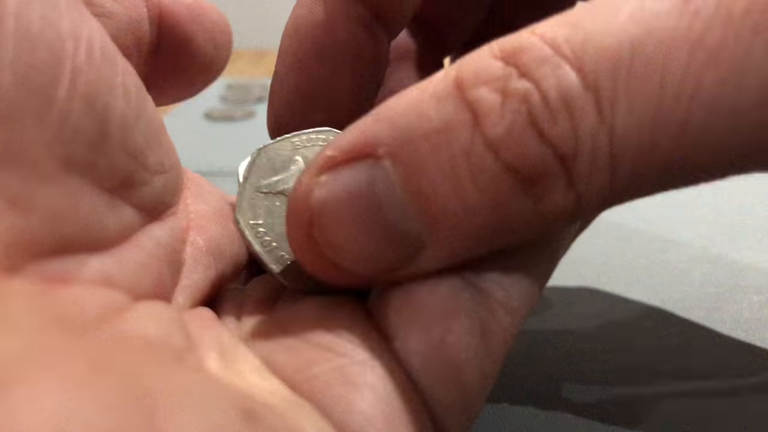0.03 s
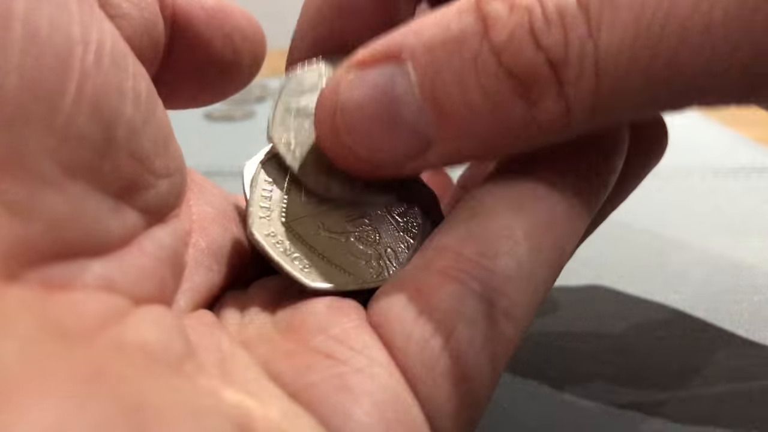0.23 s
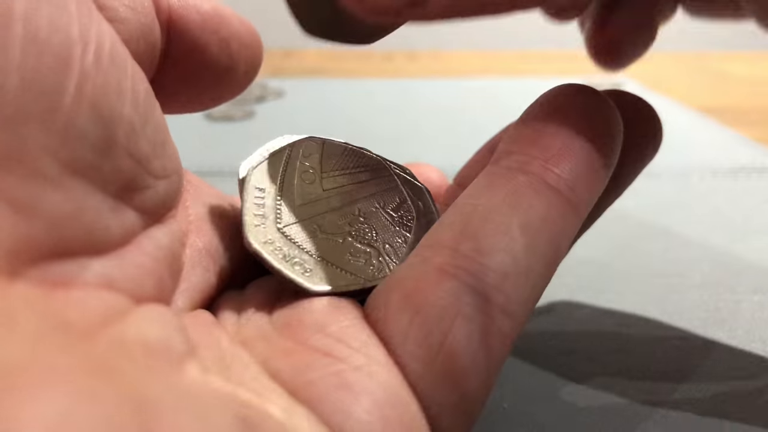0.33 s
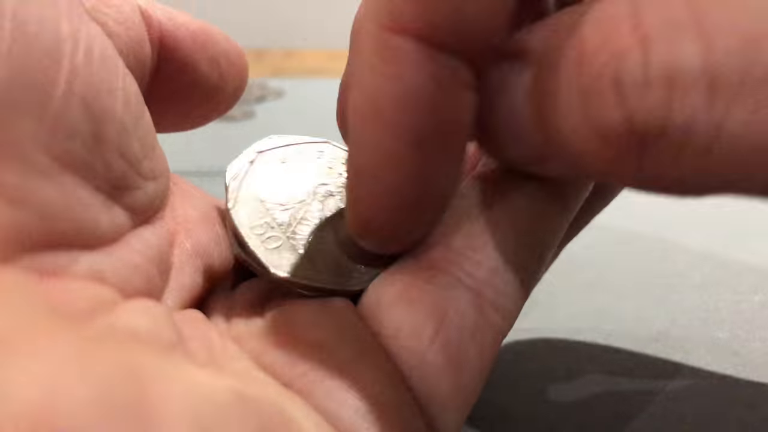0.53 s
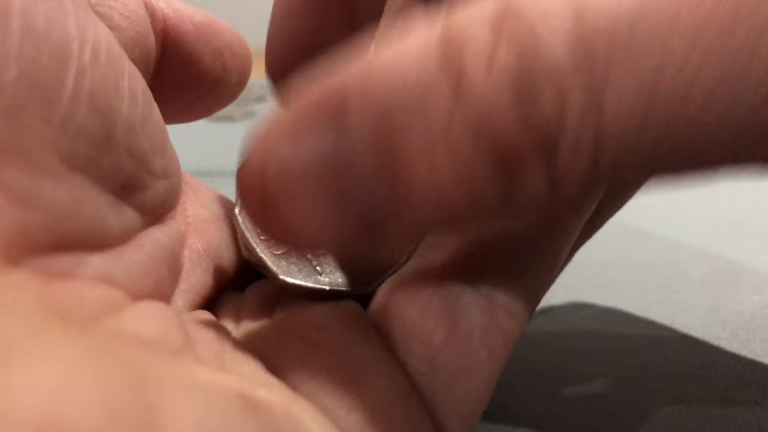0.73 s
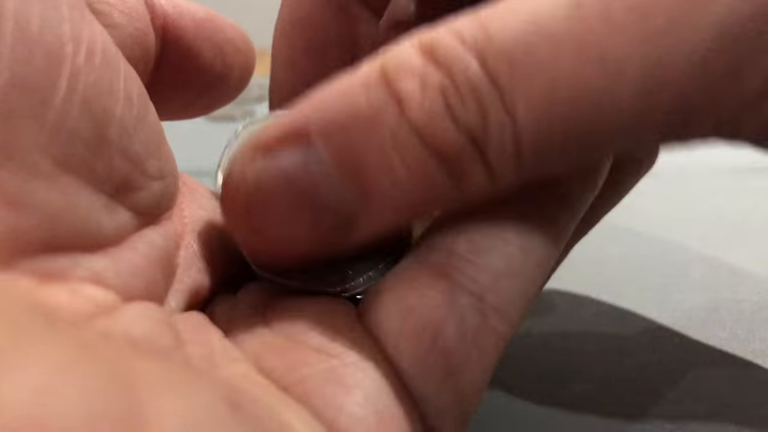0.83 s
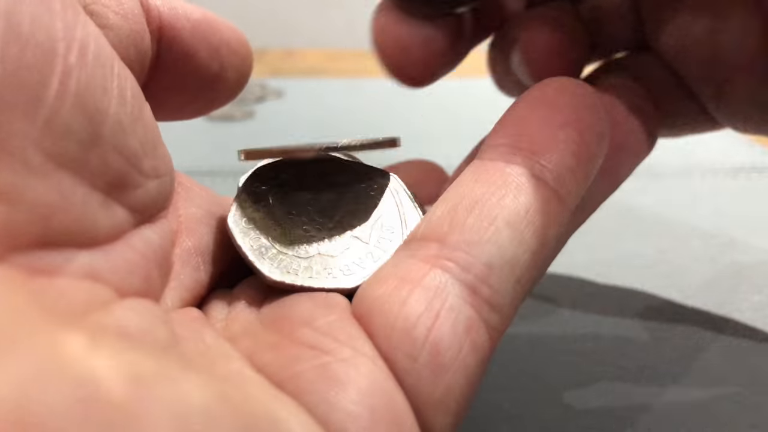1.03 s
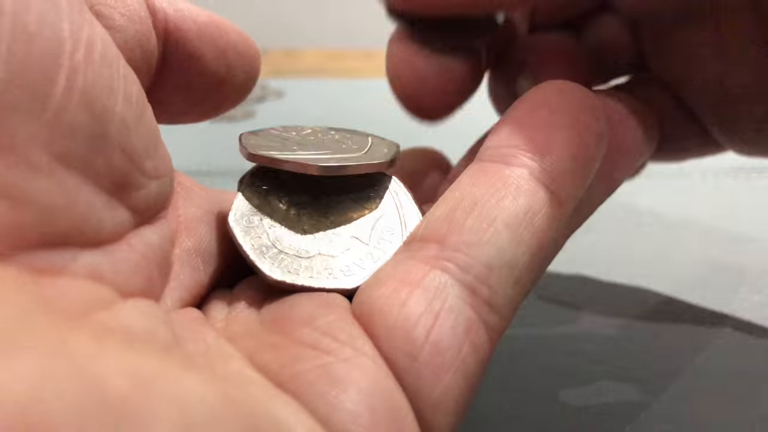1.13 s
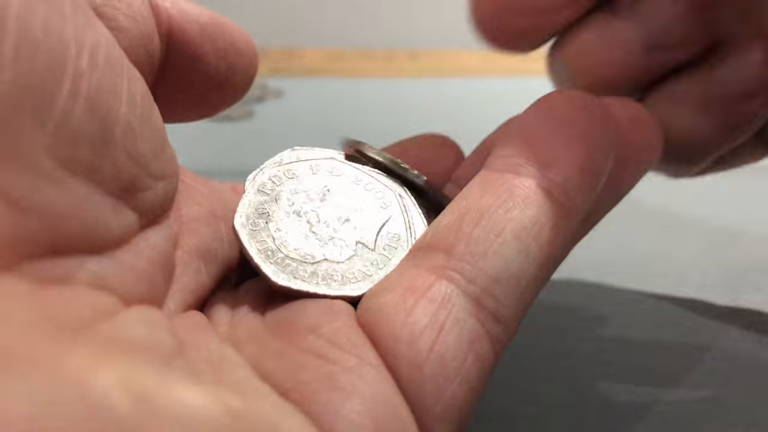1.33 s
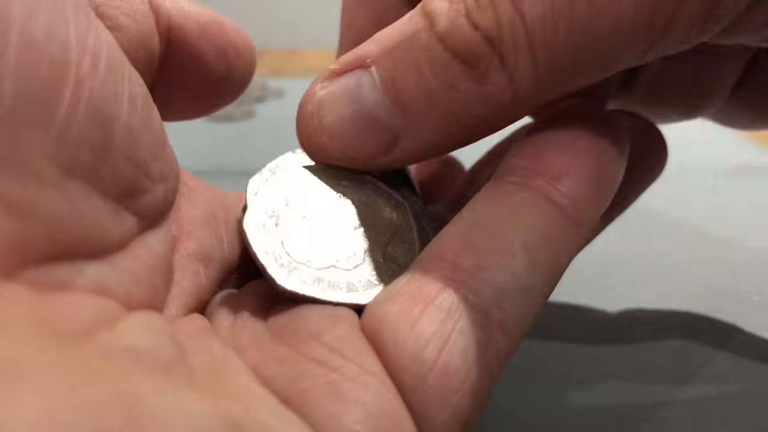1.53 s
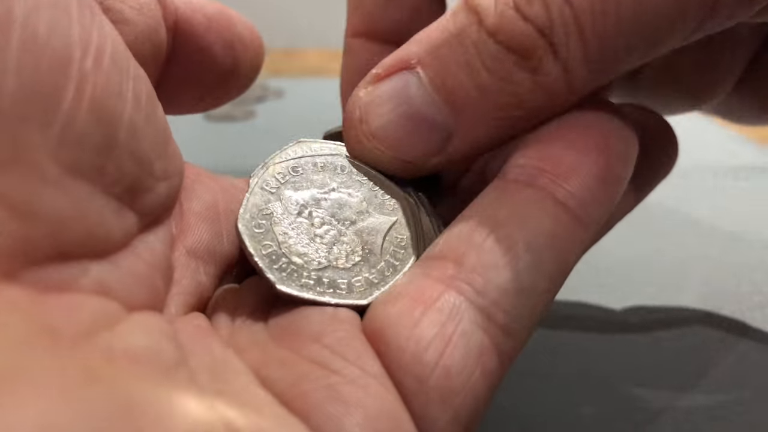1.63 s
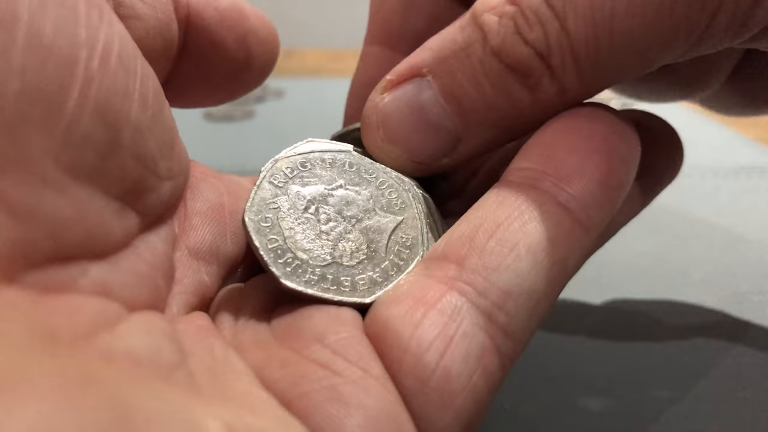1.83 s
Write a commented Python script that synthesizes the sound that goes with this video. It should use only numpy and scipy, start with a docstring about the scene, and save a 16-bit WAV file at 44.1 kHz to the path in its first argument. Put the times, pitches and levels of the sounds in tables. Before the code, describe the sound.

Coins clink and scrape against each other as fingers slide them in a palm.

```python
"""Small ticks and scrapes of coins, slid and flipped in a cupped palm, close by in a quiet room.
The rims tap each other and rub over the raised faces; skin stops nearly every ring at once.
Loose coins strike with a brighter crack, and one tips free and rings on two close tones as it turns.
Underneath lie soft bumps and rustles of the hand, still air and a faint mains hum."""
import sys
import numpy as np
from scipy import signal
from scipy.fft import rfft, irfft
from scipy.io import wavfile

SR = 44100
rng = np.random.default_rng(int(sys.argv[2]) if len(sys.argv) > 2 else 0)


def output_pcm(signal):
    """Save a mono or channel-first signal as 16-bit PCM at the path in sys.argv[1].

    Samples are clipped to [-1, 1] before scaling.
    """
    pcm = np.clip(np.atleast_2d(signal).T, -1, 1) * 32767
    wavfile.write(sys.argv[1], SR, np.round(pcm).astype(np.int16))


N = 83790

FIRM_DB, FIRM_SLIPS_PER_S = -20.5, 2400  # a scrape at this level slips this often
GRIP_STEP_S, SPOT_S = 0.0021, 0.007  # how soon the finger pressure and the touching spot change
# A rim slides over a coin's face:
# (start [s], end [s], start level [dB], end level [dB], low boost [dB], treble boost [dB])
RIM_SLIDES = [(0.122, 0.132, -50, -47.5, 22, -5), (0.203, 0.253, -35, -46.5, 9.5, -1),
              (0.258, 0.33, -53, -41.5, 12.5, -9), (0.326, 0.345, -32, -33.5, 9.5, -8),
              (0.349, 0.396, -24.5, -27.5, 6.5, 1.5), (0.537, 0.563, -20, -23, 9, 2.5),
              (0.563, 0.596, -25.5, -18.5, 6.5, 8.5), (0.595, 0.631, -19, -34, 1, 3.5),
              (0.85, 0.883, -20.5, -40.5, 7.5, 0.5), (0.868, 0.911, -38, -51, 14, 1.5),
              (0.916, 0.936, -34, -25, -2, -15), (0.936, 0.966, -15.5, -26, -0.5, -7.5),
              (0.969, 0.982, -39.5, -36, 12, -1), (0.986, 1.027, -28.5, -32, 7, -5),
              (1.02, 1.042, -16, -22, 3.5, 11), (1.045, 1.122, -28.5, -34, 4.5, 11),
              (1.13, 1.184, -22.5, -47.5, -5.5, -0.5), (1.196, 1.225, -50, -44, 10.5, -7),
              (1.268, 1.327, -27.5, -50, 1.5, -0.5), (1.315, 1.43, -44, -37, 8, -6),
              (1.448, 1.487, -29, -33.5, 0.5, 6), (1.485, 1.589, -42.5, -48.5, 9, -2),
              (1.589, 1.605, -34, -27, 10.5, 1), (1.611, 1.712, -46.5, -48.5, 19, -3)]
def scrape(start, end, from_db, to_db, low_db, treble_db, spots=4):
    """A rim catches and slips on the raised pattern; a gentle slide has fewer slips and sounds grainy."""
    n = int((end - start) * SR)
    t = np.arange(n) / SR
    level_db = np.linspace(from_db, to_db, n)
    slips_per_s = FIRM_SLIPS_PER_S * amp(0.6 * (level_db - FIRM_DB))
    slipping = rng.random(n) < slips_per_s / SR
    strength = amp(4 * np.minimum(rng.exponential(1, n), 2))  # slips differ by up to 8 dB
    slips = slipping * strength * rng.choice([-1, 1], n)
    slips /= np.sqrt(slips_per_s / FIRM_SLIPS_PER_S)  # fewer slips, same energy
    hiss = 0.18 * rng.standard_normal(n)
    pressure_db = wander(t, GRIP_STEP_S)
    force = (slips + hiss) * amp(pressure_db + level_db)
    force = unit_energy(force) * np.linalg.norm(amp(level_db))
    out = amp(-8) * signal.fftconvolve(force, unit_energy(held_ring()))
    spot = (t // SPOT_S) % spots
    for k in range(spots):  # each spot the rim touches has its own tone colour
        add(out, 0, signal.fftconvolve(force * (spot == k), stack_click(low_db, treble_db)))
    return out


# One coin rattles against another: (time [s], level [dB], low boost [dB], treble boost [dB])
RIM_TICKS = [(0.1187, -32.5, -12, -7), (0.2055, -23.5, -16, -14), (0.2190, -14.5, -34, -0.5),
             (0.271, -31, 6, -3), (0.2828, -36.5, 9, -7), (0.2979, -29, 1.5, -7.5), (0.3035, -40, -4, -7),
             (0.3114, -24, 3, -10), (0.3177, -26, -9, -3), (0.3372, -23, 5, -8), (0.3478, -16.5, 8.5, 7),
             (0.3613, -18, 9, 12), (0.368, -21.5, 7, 6), (0.5596, -12, -13, 5.5), (0.5892, -11.5, -0.5, 10),
             (0.5912, -9, -17, 17.5), (0.8518, -19.5, -5.5, -6), (0.8593, -17, -11.5, 4),
             (0.88, -27, -27, -9), (0.8888, -35, -2, -4), (0.9148, -16.5, -9, -5.5),
             (0.9371, -15.5, 0.5, 20), (0.9636, -14.5, -4.5, 5), (0.9891, -20.5, 4, 3),
             (1.0003, -18.5, -23, 11), (1.0196, -14, -21, 0), (1.0341, -14, -22, 3), (1.0404, -18, -10, 10),
             (1.3228, -29.5, 3, -23), (1.3983, -26, -8, 9), (1.4178, -26, -7, 9), (1.4402, -16.5, 2, -2.5),
             (1.4546, -23, 5.5, -8), (1.4622, -22.5, -16, -13), (1.4892, -31, 2, -3),
             (1.5031, -29.5, -6, -17), (1.5944, -17.5, -4.5, 2), (1.598, -18, 1, 5.5),
             (1.6798, -35, 8, -19), (1.8499, -31, 5.5, -2.5), (1.8802, -29.5, 9, 4), (1.8908, -35, 12, 0)]
def tick(level_db, low_db, treble_db, chatter_s=0.0007, size=600):
    """Two rims buzz together for an instant, muffled by the stack of coins."""
    age = np.arange(size) / SR / chatter_s
    chatter = rng.standard_normal(size) * np.sqrt(age) * np.exp(-age)
    out = amp(-16) * held_ring()
    add(out, 0, burst(signal.fftconvolve(chatter, stack_click(low_db, treble_db))))
    return amp(level_db) * out


LOW_PAIR_HZ, HIGH_PAIR_HZ = (8539, 8687), (14638, 14706)  # a loose coin's natural tones
# A loose coin hits or bounces:
# (time [s], crack [dB], low pair [dB], high pair [dB], time to fade by 60 dB [s])
COIN_STRIKES = [(.5329, -10, -15.5, -9.5, 0.032), (.5382, -19, -32, -24, 0.015),
                (.5406, -26, -18, -34, 0.018), (.5439, -19, -34, -21, .025),
                (.5905, -20, -24, -25.5, 0.031), (.6108, -24.5, -15, -11, 0.031),
                (1.0893, -40, -23.5, -22.5, 0.035), (1.1316, -17.5, -14, -12, 0.037),
                (1.1355, -30, -39, -21, 0.064), (1.1635, -34.5, -44.5, -24, .04),
                (1.2693, -25, -13, -19.5, .04), (1.4395, -36, -18, -24, 0.1),
                (1.5227, -33.5, -33, -44.5, 0.07), (1.6342, -28, -18, -34, 0.063)]
def strike(crack_db, low_db, high_db, fade_s, rise_s=0.0003, size=6000):
    """A crack and a softer tick, then two pairs of close tones ring until the skin stops them."""
    t = np.arange(size) / SR
    tones = np.zeros(size)
    for db, pair in [(low_db, LOW_PAIR_HZ), (high_db, HIGH_PAIR_HZ)]:
        for hz, offset_db in zip(pair, [-9, 0]):  # the lower tone is weaker, so the pair wavers mildly
            tones += amp(db + offset_db) * np.sin(2 * np.pi * (hz * t + rng.random() / 4))
    out = tones * amp(-60 * t / fade_s) * (1 - np.exp(-t / rise_s))
    add(out, 0, amp(crack_db) * crack())
    add(out, 0, tick(crack_db - 7, low_db=-8, treble_db=-12.5))
    return out


# Tone colour of a clean hit: (frequency [Hz], relative level [dB])
CRACK_COLOUR = [(200, -38), (480, -19), (1400, -13.5), (4200, 1.5), (6500, 6), (11000, -3), (16000, -7)]
def crack():
    """Metal meets metal in one sharp, bright push."""
    return burst(coloured(np.ones(1), lambda hz: look_up(CRACK_COLOUR, hz)))


# How strongly a turning coin sends out its low pair: (time [s], lower tone [dB], upper tone [dB])
COIN_TURN = [(1.1347, -32, -12), (1.143, -24.5, -28), (1.159, -19.5, -18), (1.188, -31, -26),
             (1.207, -27.5, -38), (1.225, -24, -53), (1.262, -28.5, -36), (1.277, -53.5, -24.5),
             (1.294, -47, -19.5), (1.318, -39, -36)]
def free_coin():
    """Two close tones waver against each other and trade strength as the coin tips over."""
    t = np.arange(N) / SR
    times, *levels = np.transpose(COIN_TURN)
    age = t - times[0]
    fade_in = np.clip(age * SR / 20 + 1, 0, 1)
    fade_out = np.clip((times[-1] - t) * 20, 0, 1)
    tones = sum(amp(np.interp(t, times, db)) * np.sin(2 * np.pi * hz * age)
                for hz, db in zip(LOW_PAIR_HZ, levels))
    return np.sqrt(2) * fade_in * fade_out * tones


# Tone colour of the coins pressed together: (frequency [Hz], relative level [dB])
STACK_COLOUR = [(80, -44), (500, -27.5), (1400, -21), (2300, -12.5), (3100, -15.5), (4600, -4),
                (6200, -1.5), (7800, -3), (9900, 3.5), (13300, -5.5), (15000, -4), (16000, -13)]
def stack_click(low_db, treble_db, blur_hz=3560, blur_s=0.002, size=512):
    """The pressed coins answer one touch with a click and a blur of tones that die at once."""
    blur = signal.lfilter(*signal.butter(1, blur_hz, "high", fs=SR), rng.standard_normal(size))
    touch = amp(3) * unit_energy(blur * np.exp(-np.arange(size) / SR / blur_s))
    touch[0] += 1  # the click
    corners_hz, boosts_db = [3500, 6500, 11000, 14000], [low_db, 0, 0, treble_db]
    return coloured(touch, lambda hz: look_up(STACK_COLOUR, hz) + np.interp(hz, corners_hz, boosts_db))


# Natural tones of held coins: (frequency [Hz], relative level [dB], time to fade by 60 dB [s])
HELD_TONES = [(6114, -9, 0.12), (7040, -7, 0.04), (8650, 7, 0.036), (9800, 8, 0.023), (13800, -4, 0.028)]
def held_ring(detune=0.02, size=5000):
    """A held coin rings briefly; each grip shifts its tones a little."""
    t = np.arange(size) / SR
    gains = unit_energy(amp([db for _, db, _ in HELD_TONES]))
    out = np.zeros(size)
    for gain, (hz, _, fade_s) in zip(gains, HELD_TONES):
        gripped_hz = hz * (1 + detune * rng.uniform(-1, 1))
        out += gain * amp(-60 * t / fade_s) * np.sin(2 * np.pi * gripped_hz * t)
    return np.sqrt(2) * out


# Fingers bump the palm: (time [s], level [dB])
PALM_BUMPS = [(.608, -51), (.858, -53.5), (.96, -56), (1.022, -51), (1.32, -63), (1.6, -57), (1.644, -55.5)]
def bump(level_db, rise_s=0.011, band_hz=(37.5, 150), size=6000):
    """Skin lands on skin with a soft, low thud."""
    age = np.arange(size) / SR / rise_s
    return amp(level_db) * band_noise(band_hz, size) * age * np.exp(1 - age)


# How loudly the skin rubs: (time [s], level [dB])
SKIN_RUB = [(0, -79), (0.602, -70), (1.147, -64), (1.9, -70)]
def rustle(band_hz=(210, 446)):
    """Skin rubs with a dull noise that grows as the hand gets busier."""
    level_db = np.interp(np.arange(N) / SR, *np.transpose(SKIN_RUB))
    return amp(level_db) * band_noise(band_hz, N)


# How long sound lingers in the room: (frequency [Hz], time to fade by 60 dB [s])
ROOM_FADE = [(300, 1), (4500, 0.55), (9000, 0.38), (15000, 0.32)]
def room_echo(sound):
    """The room adds a smooth tail whose treble dies first."""
    hz, t, spectrum = signal.stft(rng.standard_normal(SR // 2), SR, nperseg=256)
    fade = amp(-60 * t / look_up(ROOM_FADE, hz)[:, None])
    _, tail = signal.istft(spectrum * fade, SR, nperseg=256)
    return signal.fftconvolve(sound, unit_energy(tail))[:N]


# Tone colour of the room's air: (frequency [Hz], relative level [dB])
AIR_COLOUR = [(25, -22.5), (55, -1), (160, -3.5), (800, -12.5), (3000, -19), (9000, -25.5), (16000, -24.5)]
def room_air(level_db=-65):
    """Still air makes a steady hush, strongest in the bass."""
    gains = amp(look_up(AIR_COLOUR, np.fft.rfftfreq(N, 1 / SR)))
    hush = irfft(rfft(rng.standard_normal(N)) * gains, N)
    return amp(level_db) * unit_level(hush)


# Tones of the mains hum: (frequency [Hz], level [dB])
HUM_TONES = [(50, -74.5), (100, -79), (150, -70.5)]
def mains_hum():
    """Mains power hums on three steady, low tones."""
    t = np.arange(N) / SR
    return np.sqrt(2) * sum(amp(db) * np.sin(2 * np.pi * (hz * t + rng.random())) for hz, db in HUM_TONES)


def amp(db):
    """Turns decibels into a gain."""
    return 10 ** (np.asarray(db) / 20)


def unit_energy(x):
    """Scales a sound so that its squares add up to one."""
    return x / np.sqrt(np.sum(x ** 2) + 1e-20)


def unit_level(x):
    """Scales a sound to an average (rms) level of one."""
    return unit_energy(x) * np.sqrt(len(x))


def burst(x):
    """Gives a short sound the energy of 2.5 ms at level one."""
    return unit_energy(x) * np.sqrt(0.0025 * SR)


def look_up(table, hz):
    """Reads between a table's rows, with octaves evenly spaced."""
    row_hz, values = np.transpose(table)
    return np.interp(np.log(hz + 1), np.log(row_hz + 1), values)


def add(mix, start_s, sound):
    """Mixes a sound in at the given time."""
    part = mix[round(start_s * SR):][:len(sound)]
    part += sound[:len(part)]


def wander(t, step_s, count=256):
    """A random curve that reaches a new value every step."""
    return np.interp(t / step_s, np.arange(count), rng.standard_normal(count))


def band_noise(band_hz, size):
    """Noise between two frequencies, at level one."""
    band = signal.butter(2, band_hz, "band", fs=SR, output="sos")
    return unit_level(signal.sosfilt(band, rng.standard_normal(size)))


def coloured(force, db_at, size=1024):
    """Gives a force the tone colour db_at(hz) and an energy of one."""
    log_response = irfft(np.log(amp(db_at(np.fft.rfftfreq(size, 1 / SR)))))
    log_response[1:size // 2] *= 2
    log_response[size // 2 + 1:] = 0  # nothing sounds before the push
    response = irfft(np.exp(rfft(log_response)))
    return unit_energy(signal.fftconvolve(force, response))


def scene():
    """Coins and hand, with the room around them."""
    hand = free_coin() + rustle()
    for table, source in [(COIN_STRIKES, strike), (RIM_TICKS, tick), (PALM_BUMPS, bump)]:
        for start, *settings in table:
            add(hand, start, source(*settings))
    for start, *settings in RIM_SLIDES:
        add(hand, start, scrape(start, *settings))
    return (hand + amp(-24) * room_echo(hand) + room_air() + mains_hum())[None]


def record(dry, lowest_hz=40, highest_hz=15900):
    """Rounds off the tallest peaks, then drops the deepest bass and the highest treble."""
    bass_cut = signal.butter(2, lowest_hz, "high", fs=SR, output="sos")
    treble_cut = signal.firwin(301, highest_hz, window=("kaiser", 8), fs=SR)
    rounded = signal.sosfilt(bass_cut, np.tanh(dry))
    return signal.oaconvolve(rounded, treble_cut[None], "same")


dry = scene()
out = record(dry)
output_pcm(out)
```